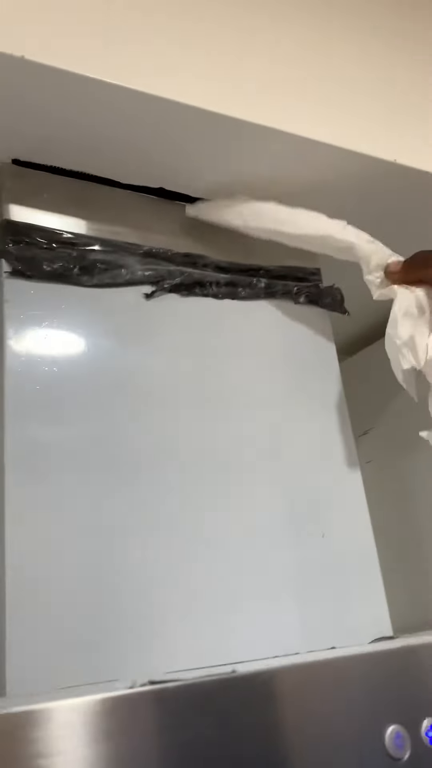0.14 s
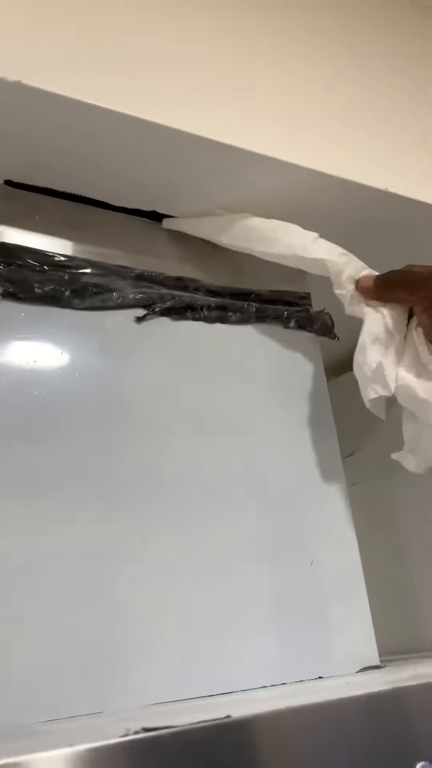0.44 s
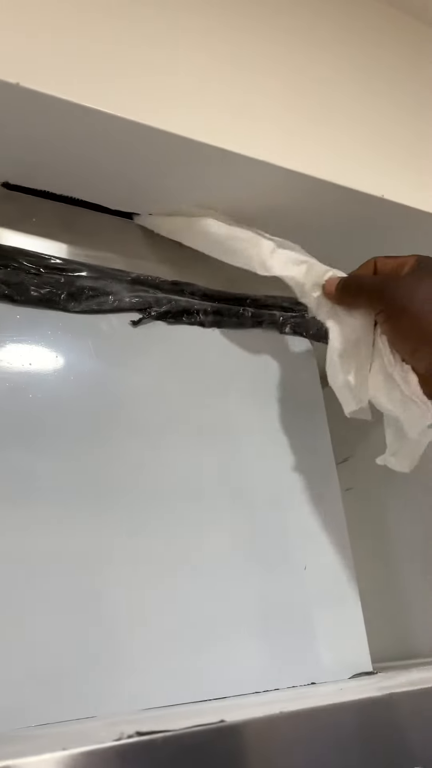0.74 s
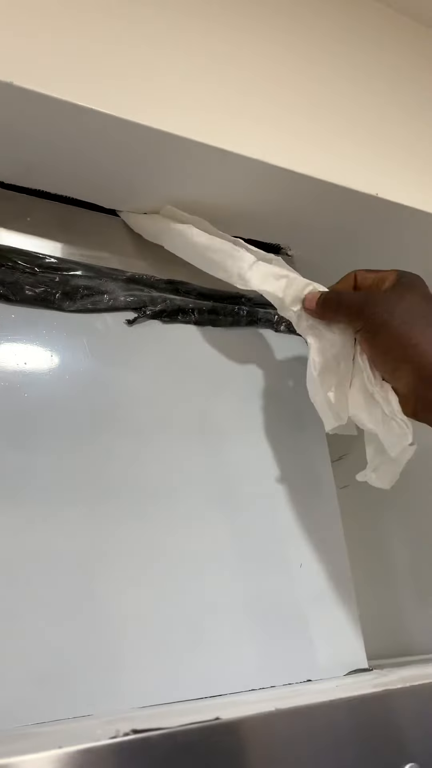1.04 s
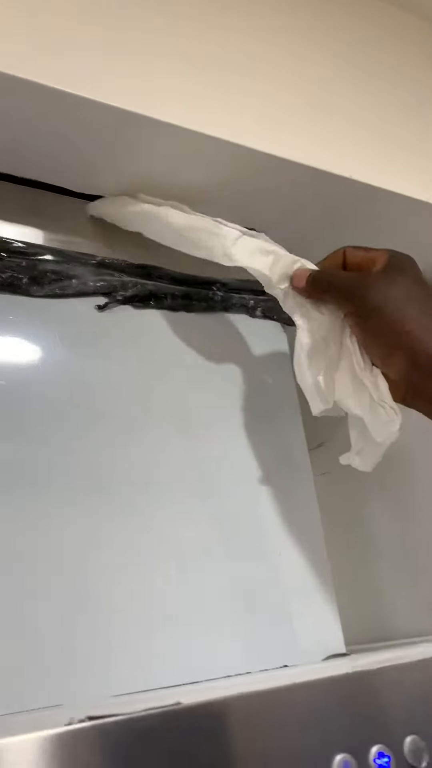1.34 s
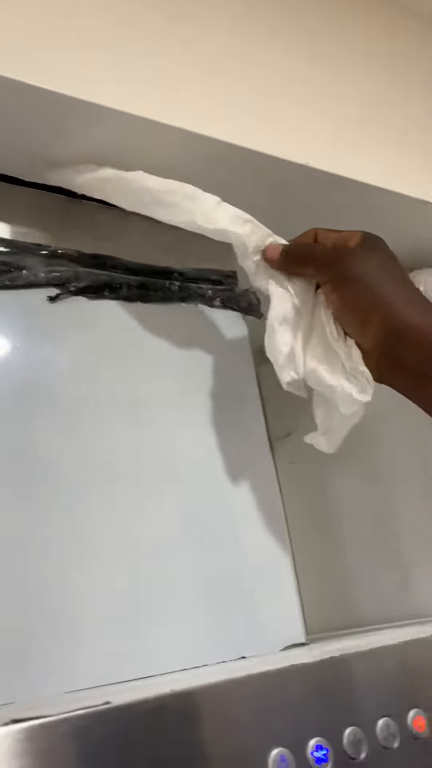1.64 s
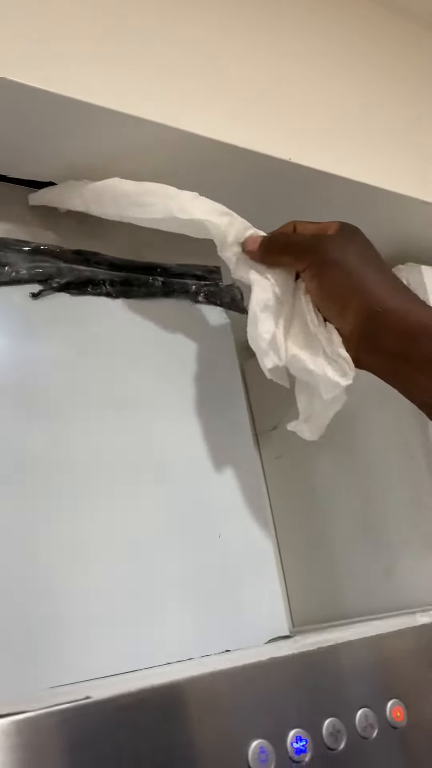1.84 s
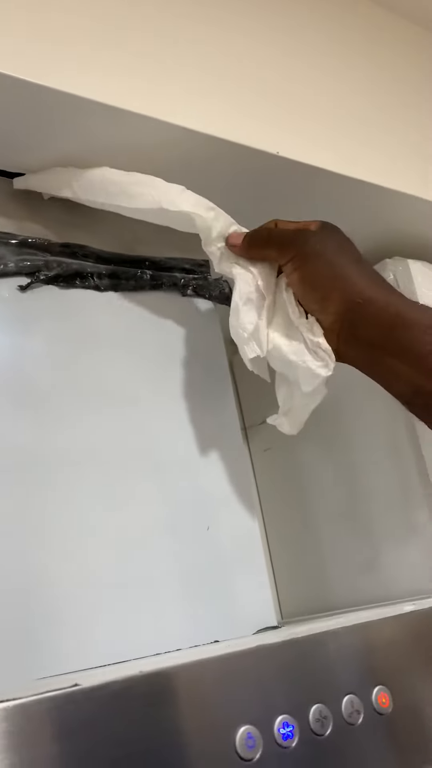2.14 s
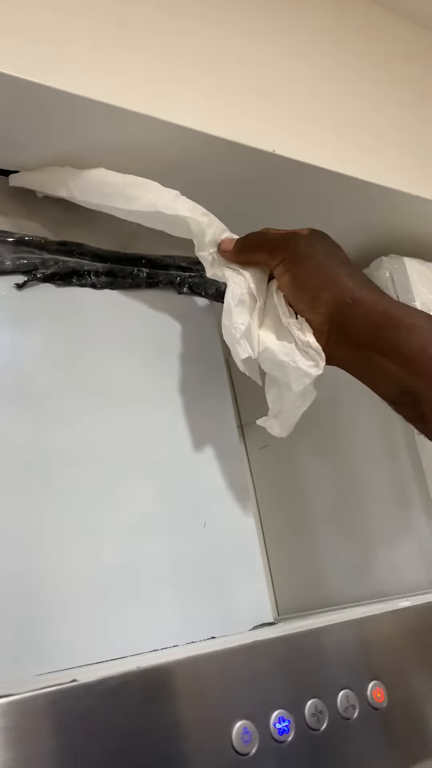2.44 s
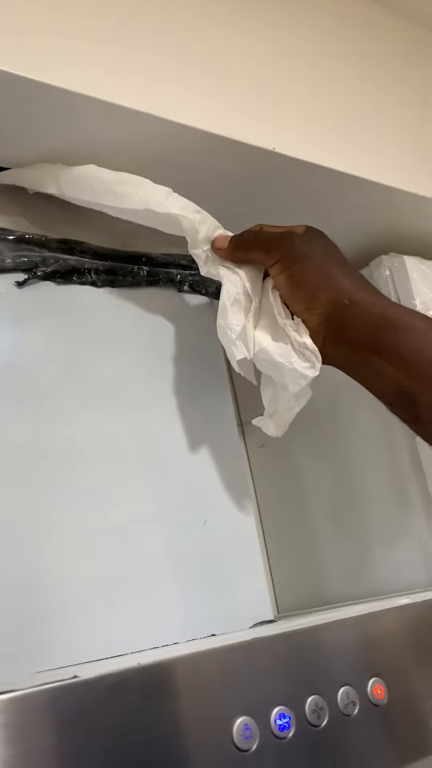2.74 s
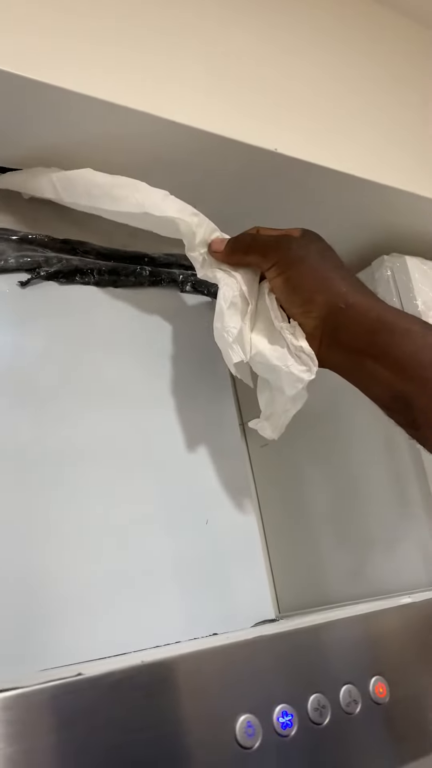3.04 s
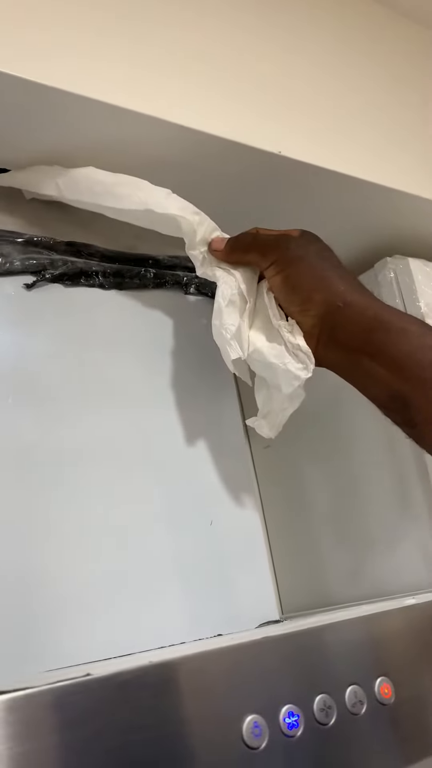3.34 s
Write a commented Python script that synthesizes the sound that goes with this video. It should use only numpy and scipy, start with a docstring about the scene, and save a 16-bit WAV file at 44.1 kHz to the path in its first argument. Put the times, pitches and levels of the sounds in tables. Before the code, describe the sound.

Kitchen extractor fan blowing constantly with deep hum, rushing air and a soft leaking hiss

```python
"""Kitchen extractor fan and a paper tissue

A kitchen extractor fan runs steadily, heard from close by on a phone. The motor sums sines near twice the mains
frequency and above; air roars through a sheet-metal duct and hisses out of a loose joint, both as coloured noise.
At the start a paper tissue is brushed along the joint and rustles faintly: grains, friction noise and snaps.
"""
import sys
import numpy as np
from scipy import signal
from scipy.fft import rfft, irfft, next_fast_len
from scipy.io import wavfile
from scipy.ndimage import uniform_filter1d, map_coordinates

SR = 44100
rng = np.random.default_rng(int(sys.argv[2]) if len(sys.argv) > 2 else 0)


def digitize_waveform(pressure):
    """Quantize a signal to 16-bit integers and store it at the path in sys.argv[1].

    Rows of a 2-D input are taken as channels; values are limited to [-1, 1].
    """
    field = np.atleast_2d(pressure).T
    bounded = np.clip(field, -1, 1)
    quanta = np.round(bounded * 32767).astype(np.int16)
    wavfile.write(sys.argv[1], SR, quanta)


N = 154350

# Steady motor hum: pitch_hz, level_db (rms), waver_db
HUM_LINES = [(119.95, -36.9, .4), (239.9, -40.6, .5)]
# Faint unsteady whine of the motor: pitch_hz, level_db (rms), waver_db
WHINE_LINES = [(2610, -71, 3), (2728, -71, 3)]
# Air roar coloured by the duct's resonances, before swell and echoes: frequency_hz, density_db_per_hz
ROAR_SPECTRUM = [(20, -95), (32, -82), (50, -65), (62, -59), (74, -58), (82, -66), (110, -65), (128, -69.5),
                 (160, -61.5), (190, -58.5), (230, -60), (253, -63), (262, -59), (280, -67.5), (300, -71),
                 (335, -63), (385, -72), (400, -74), (415, -68), (435, -73), (465, -78), (498, -72),
                 (521, -63), (538, -70), (570, -62.5), (595, -64.5), (618, -70), (635, -67), (665, -63.5),
                 (680, -71), (710, -70), (740, -72), (790, -69.5), (855, -68.5), (880, -73), (965, -75.5),
                 (1100, -73), (1370, -77), (1410, -73), (1470, -77), (1525, -73.5), (1620, -78),
                 (1890, -83), (2010, -80), (2100, -85), (2250, -84), (2400, -89), (2500, -85),
                 (2740, -86.5), (2800, -92), (2980, -95), (3060, -89), (3150, -94), (3230, -91),
                 (4500, -110), (6000, -150)]
# Hiss of the leaking joint, before its level wavers and echoes: frequency_hz, density_db_per_hz
LEAK_SPECTRUM = [(1200, -110), (2600, -89.5), (3000, -91.5), (4000, -88), (5000, -91.7), (6300, -94),
                 (7000, -97.5), (7700, -103.7), (8800, -98.6), (9200, -100.6), (9550, -106.5),
                 (10200, -105.6), (11000, -111.5), (13000, -115), (15000, -121), (16000, -128)]
# Slow swell of the roar: time_s, gain_db
ROAR_SWELL = [(0, 0), (.6, -.5), (1.1, 0), (1.7, 0.1), (2.3, 0), (2.9, 0.6), (3.5, 0)]
# Strokes of the tissue: time_s, level_db (before the quick wavers)
BRUSH_STROKES = [(0, -63), (.02, -60), (.06, -63), (.1, -74), (.115, -61), (.14, -59), (.165, -48),
                 (.185, -51), (.205, -56), (.235, -65), (.28, -76), (.35, -61), (.385, -66), (.43, -58),
                 (.47, -59), (.54, -53.5), (.565, -56), (.585, -54), (.615, -57.5), (.665, -50.5),
                 (.715, -49), (.735, -54), (.8, -63), (.9, -80), (1.05, -85), (1.17, -70), (1.3, -85)]
# Single creases snapping: start_s, level_db (at onset, before the crease colour)
CREASE_SNAPS = [(.116, -44), (.1335, -37), (.142, -45), (.147, -43)]
# Relative colour of the rubbed paper: frequency_hz, gain_db
PAPER_COLOUR = [(2500, -30), (4000, -6), (6800, 1), (7600, -2), (9000, 0), (10200, -1), (11000, -7),
                (13000, -8), (15500, -11), (16500, -40)]
# Colour of a snapping crease, brighter than the rubbing: frequency_hz, gain_db
CREASE_COLOUR = [(3000, -30), (6000, -8), (9000, 0), (13000, -2), (15500, -5), (16500, -40)]
# Likeness of the left and right noise: frequency_hz, correlation (1 = identical)
STEREO_LIKENESS = [(45, .9999), (120, .99), (200, .995), (300, .92), (500, .86), (1000, .8), (1800, .8),
                   (2600, .4), (3500, .7), (4400, .97), (4750, .998), (5100, .97), (5800, .9), (6500, .97),
                   (8000, .88), (8600, .99), (9200, .998), (10000, .9), (12000, .92), (13200, .995),
                   (15000, .9)]
# Level balance: frequency_hz, left_minus_right_db
STEREO_LEAN = [(40, 0), (120, -.7), (200, -.2), (300, -.6), (500, -1.8), (1000, -1), (2200, -1.1),
               (4000, 0)]
# Phase lead of the left channel, as by a fixed delay above a crossover: frequency_hz, lead_turns
LEFT_LEAD = [(0, 0), (1500, 0), (2500, .17), (3500, .25), (4750, .5), (6900, 1), (15250, 3), (22050, 4.62)]

FLUTTER_DB = 3  # rms depth of the gain patches in the rubbing
GRAINS_PER_S, GRAIN_SPREAD_DB = 4000, 2
GRAIN_SHARE = .2  # part of the rubbing power due to grains
ECHOES, ECHO_SPAN_S, ECHO_DB = 12, .04, -22  # number, longest delay, level each approaches in the treble
TOP_HZ = 15750  # upper band limit


def amp(db):
    """Decibel law: a level in dB becomes an amplitude ratio."""
    return 10 ** (np.asarray(db) / 20)


def unit(x):
    """Normalisation: the signal is scaled to an rms of 1."""
    return x / np.sqrt(np.mean(x ** 2) + 1e-20)


def along(points, hz):
    """Logarithmic frequency scale: (Hz, value) points are joined by straight lines on it."""
    point_hz, value = np.transpose(points)
    return np.interp(np.log(hz + 1), np.log(point_hz + 1), value)


def wobble(rate):
    """Slow random variation: a smooth curve through rate random knots a second."""
    knots = rng.standard_normal(int(N * rate / SR) + 4)
    return map_coordinates(knots, [np.arange(N) * rate / SR])


def filtered(x, response):
    """Linear filtering: the spectrum is multiplied by a complex response of frequency."""
    size = next_fast_len(N + SR // 2)  # padded so that the filter's tail does not wrap round
    hz = np.fft.rfftfreq(size, 1 / SR)
    return irfft(rfft(x, size) * response(hz), size)[..., :N]


def patchy(x, depth_db, frames):
    """Time-frequency modulation: random gain patches, smoothed over some frames of about 6 ms."""
    bins = signal.stft(x, nperseg=512)[2]
    field = rng.standard_normal(bins.shape[1:])  # shared by both channels
    field = uniform_filter1d(field, size=6, axis=0)  # across frequency
    field = uniform_filter1d(field, size=frames, axis=1)  # across time
    return signal.istft(bins * amp(depth_db * unit(field)), nperseg=512)[1][:, :N]


def spread(pair, spectrum):
    """Partial coherence: two unrelated signals are coloured and mixed to a set left-right likeness."""
    def response(hz):
        # cos^2 - sin^2 of this angle is the wanted correlation; the power stays the same
        angle = np.arccos(np.clip(along(STEREO_LIKENESS, hz), -1, 1)) / 2
        return amp(along(spectrum, hz)) * [np.cos(angle), np.sin(angle)]

    mid, side = filtered(pair, response)
    return np.array([mid + side, mid - side])


def motor_line(pitch_hz, level_db, waver_db, drift_turns):
    """Sinusoidal oscillation: one motor tone with random waver of level and drift of phase."""
    t = np.arange(N) / SR
    level = np.sqrt(2) * amp(level_db + waver_db * wobble(5.98))  # sqrt(2) turns rms into peak
    turns = pitch_hz * t + rng.random() + drift_turns * wobble(5.95)
    return level * np.sin(2 * np.pi * turns)


def motor():
    """Superposition: steady hum lines and a whine of looser phase add up."""
    hum = sum(motor_line(*row, drift_turns=.005) for row in HUM_LINES)
    whine = sum(motor_line(*row, drift_turns=.2) for row in WHINE_LINES)
    return hum + whine


def turbulence(spectrum, patchy_db):
    """Broadband flow noise: random pressure of a given spectral density with patches of random gain."""
    noise = patchy(rng.standard_normal((2, N)), patchy_db, frames=10)
    density_one = unit(noise) * np.sqrt(SR / 2)  # mean power of 1 per Hz
    return spread(density_one, spectrum)


def duct_roar():
    """Resonance colouring: flow noise shaped by the sheet-metal duct swells a little."""
    swell_db = np.interp(np.arange(N) / SR, *np.transpose(ROAR_SWELL))
    level = amp(swell_db + .38 * wobble(8))
    return level * turbulence(ROAR_SPECTRUM, patchy_db=.64)


def joint_hiss():
    """Jet noise: air leaking from the loose joint gives treble noise that breathes a little."""
    level = amp(.5 * wobble(7) + .4 * wobble(14))
    return level * turbulence(LEAK_SPECTRUM, patchy_db=1.3)


def kitchen(x):
    """Interference: weak early echoes off cabinets and ceiling give the air noise a fine ripple of colour."""
    delay_s = ECHO_SPAN_S * rng.random(ECHOES)
    sign = rng.choice([-1, 1], ECHOES)

    def response(hz):
        echoes = sum(s * np.exp(-2j * np.pi * hz * d) for d, s in zip(delay_s, sign))
        return 1 + amp(ECHO_DB) * echoes * hz / (hz + 1000)  # weaker echoes in the bass

    return filtered(x, response)


def tissue_rub():
    """Stick-slip friction: dense fibre grains over soft friction noise follow the strokes."""
    hits = rng.random((2, N)) < GRAINS_PER_S / SR
    size = amp(GRAIN_SPREAD_DB * rng.exponential(size=(2, N)))
    grains = unit(hits * size * rng.standard_normal((2, N)))
    friction = rng.standard_normal((2, N))
    rub = np.sqrt(GRAIN_SHARE) * grains + np.sqrt(1 - GRAIN_SHARE) * friction
    time_s, level_db = np.transpose(BRUSH_STROKES)
    stroke_db = np.interp(np.arange(N) / SR, time_s, level_db, right=-120)
    stroke = amp(stroke_db + .8 * wobble(60) + .6 * wobble(250))
    return stroke * unit(spread(patchy(rub, FLUTTER_DB, frames=2), PAPER_COLOUR))


def tissue_snaps():
    """Impulsive release: each snapping crease is a noise burst that falls 60 dB in 4 ms."""
    snaps = np.zeros((2, N))
    t = np.arange(SR // 100) / SR
    for start_s, level_db in CREASE_SNAPS:
        start = round(start_s * SR)
        decay = amp(level_db - 60 * t / .004)
        snaps[:, start:start + len(t)] += decay * rng.standard_normal((2, len(t)))
    return spread(snaps, CREASE_COLOUR)


def scene():
    """Superposition: motor, air with its echoes, and tissue sound together."""
    air = duct_roar() + joint_hiss()
    return motor() + kitchen(air) + tissue_rub() + tissue_snaps()


def record(dry):
    """Interchannel difference: the phone's stereo pair gets level lean, left lead and a band limit."""
    side = np.array([[.5], [-.5]])  # half of each difference to the left, half to the right

    def response(hz):
        lead_turns = side * np.interp(hz, *np.transpose(LEFT_LEAD))
        lean = amp(side * along(STEREO_LEAN, hz))
        return lean * np.exp(2j * np.pi * lead_turns) * (hz < TOP_HZ)

    return filtered(dry, response)


dry = scene()
out = record(dry)
digitize_waveform(out)
```